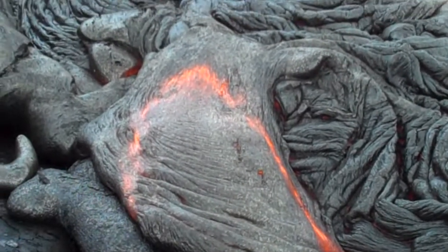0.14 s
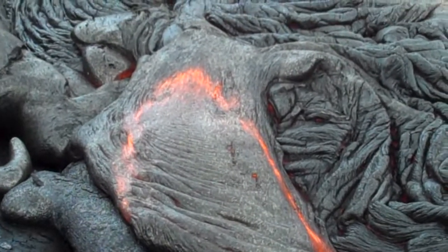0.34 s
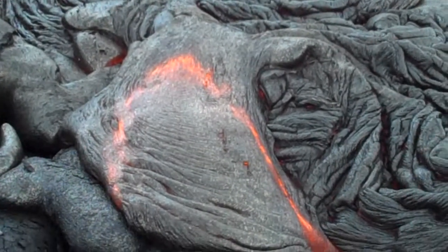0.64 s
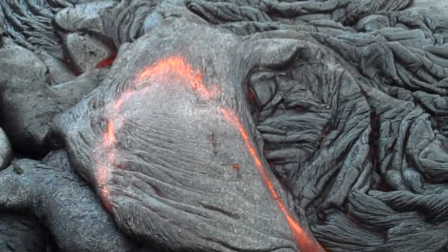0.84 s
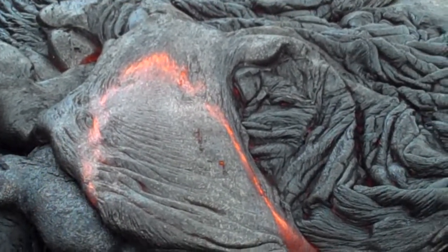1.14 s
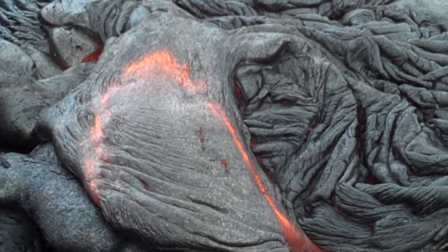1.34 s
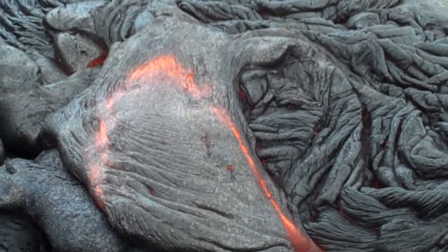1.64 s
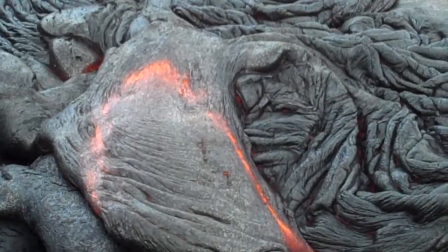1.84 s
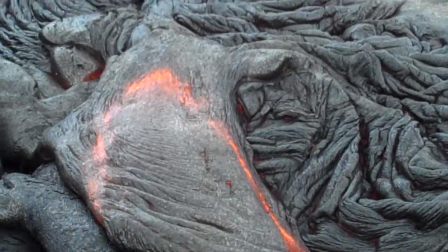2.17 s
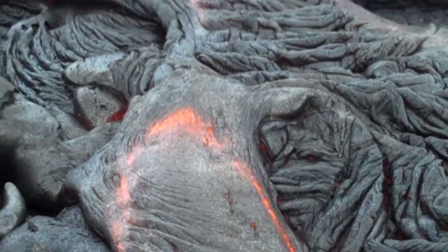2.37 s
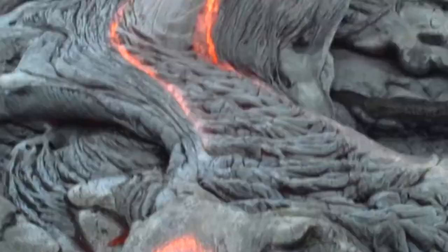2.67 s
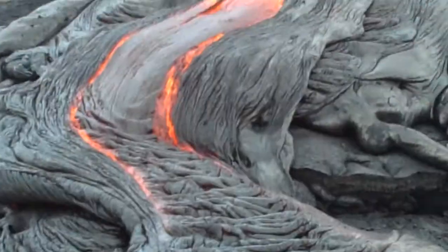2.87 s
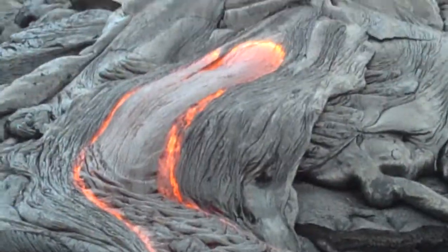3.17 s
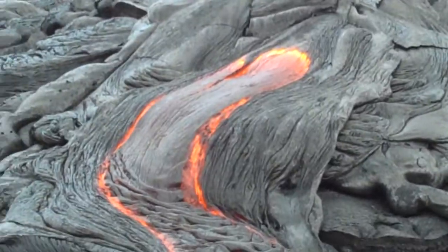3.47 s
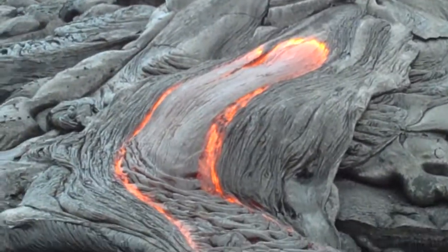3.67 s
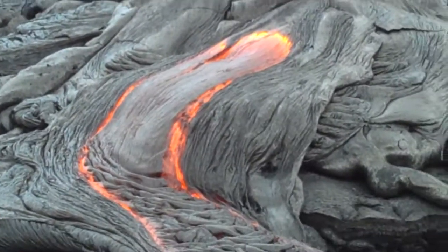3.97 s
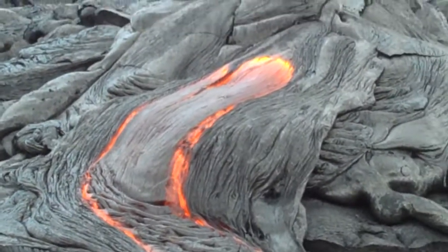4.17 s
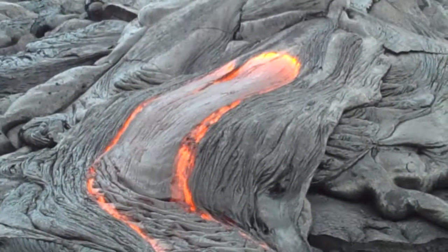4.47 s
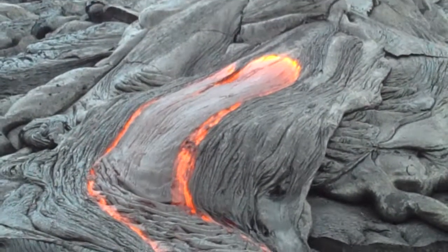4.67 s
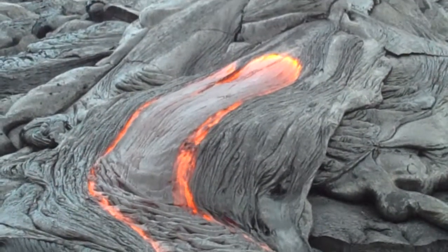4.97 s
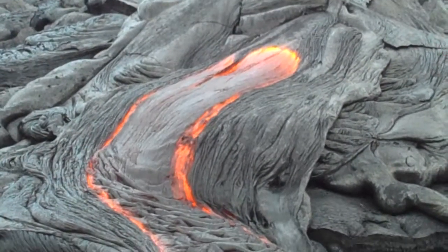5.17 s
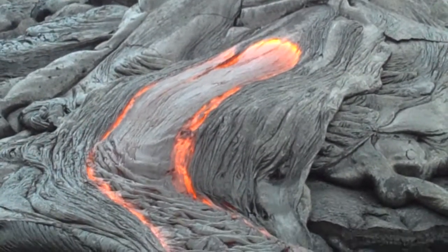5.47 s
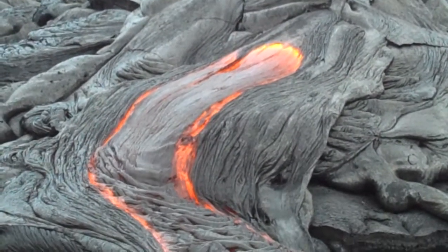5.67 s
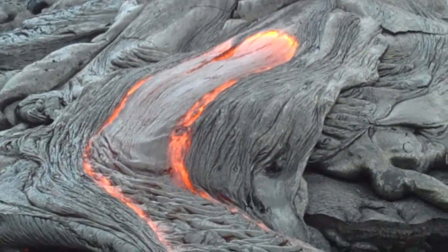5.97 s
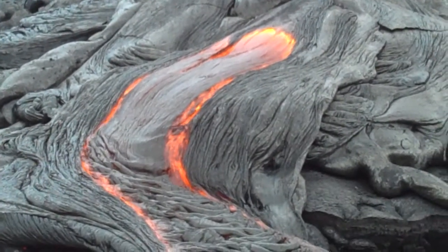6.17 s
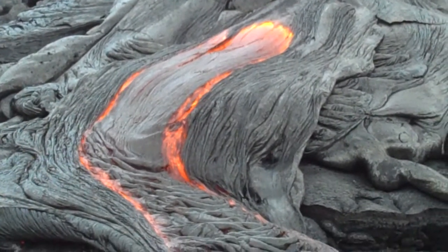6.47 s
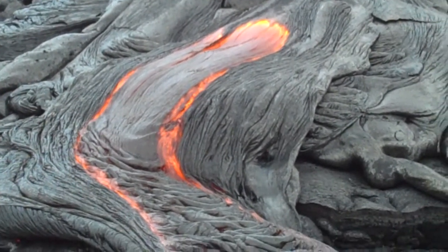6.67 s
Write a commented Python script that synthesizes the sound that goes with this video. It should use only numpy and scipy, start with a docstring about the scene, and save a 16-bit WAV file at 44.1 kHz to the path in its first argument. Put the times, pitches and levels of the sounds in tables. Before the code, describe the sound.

Outdoors and very close, cooling lava crust gives a continuous soft hiss filled with tiny irregular glassy ticks, over a barely audible low rumble. Faint muffled thuds, like wind or handling, bump in the first second. Small crumbling swells gather at about 0.9, 1.3 and 1.6 s, with dry cracks near 0.9 and 1.2 s and a chip at 1.3 s. A tight cluster of stronger cracks comes at 2.5 to 2.75 s, followed by low thuds. A gritty, rising rasp and crumble passes around 3.1 s, then one plate gives a hard, sharp snap at 3.4 s, the loudest moment. A chip taps at 3.55 s. Bright crackling bursts at 4.3 to 4.6 s, thins around 5 s, then returns glassier at 5.7 and 6.25 s. A short stout crack lands at 6.4 s; fine ticking and slightly fuller hiss continue to the end.

```python
"""Tiny glassy flakes tick without pause over a soft hiss: lava crust cooling outdoors, close to the microphone.
Hiss and faint rumble are coloured noise; ticks are random impulses and short clinks. Crumbling swells mix
coarse and fine grains, the skin rasps in gliding rings. Soft low thuds, as of handling or wind on the
microphone, are muffled noise. Single cracks ring, splinters tick, chips strike the microphone, and one plate
gives way with a sharp snap."""
import sys
import numpy as np
from scipy import signal
from scipy.fft import rfft, irfft, next_fast_len
from scipy.io import wavfile
from scipy.ndimage import map_coordinates

SR = 44100
rng = np.random.default_rng(int(sys.argv[2]) if len(sys.argv) > 2 else 0)


def persist_wave(psi):
    """Save psi, clipped to +-1, as 16-bit WAV."""
    counts = np.round(np.clip(psi, -1, 1) * 32767).astype(np.int16)
    wavfile.write(sys.argv[1], SR, np.atleast_2d(counts).T)


N = 300762

# swells of crumbling: peak_s, rise_s, fall_s (both to 1/e), coarse_gain_db, fine_gain_db
SWELL_ROWS = [(.24, .08, 0.075, -59, -59), (.875, 0.034, 0.057, -53, -52), (.93, .03, 0.045, -51.5, -61),
              (1.25, 0.057, .04, -56, -64), (1.335, .03, 0.035, -50.5, -53.5),
              (1.565, 0.023, .04, -46.5, -47.5), (1.685, 0.012, 0.011, -59, -54),
              (2.0, 0.023, 0.03, -58, -54), (2.135, 0.019, 0.02, -51, -53),
              (2.715, 0.048, 0.052, -53, -57.5), (2.835, 0.012, 0.017, -51.5, -70),
              (3.16, 0.099, 0.053, -54, -60), (3.225, 0.035, 0.041, -47, -49),
              (3.615, .015, 0.028, -62, -55.5), (3.77, 0.016, 0.022, -46.5, -59),
              (3.86, .03, 0.042, -53, -50.5), (4.21, 0.018, 0.014, -55.5, -58),
              (4.37, 0.043, 0.036, -60, -58.5), (4.45, 0.021, 0.09, -46.5, -44),
              (5.04, 0.22, 0.3, -62, -60.5), (5.671, .018, 0.056, -52.5, -43),
              (5.755, .035, 0.058, -55.5, -46.5), (5.97, 0.043, 0.044, -64, -50.5),
              (6.13, 0.068, .09, -63, -55), (6.262, 0.046, .04, -48.5, -44), (6.35, .04, 0.059, -62, -59.5)]


def amp(db):
    """Decibels to gain."""
    return 10 ** (np.asarray(db) / 20)


def unit(x):
    """x at rms 1."""
    return x / np.sqrt(np.mean(x ** 2) + 1e-20)


def wobble(rate_hz):
    """Smooth random curve with rate_hz knots a second."""
    knots = rng.standard_normal(int(N * rate_hz / SR) + 4)
    return map_coordinates(knots, [np.arange(N) * rate_hz / SR])


def filtered(x, response):
    """x times a complex response of frequency, zero-padded."""
    m = next_fast_len(len(x) + min(len(x), SR // 5))
    spectrum = rfft(x, m) * response(np.fft.rfftfreq(m, 1 / SR))
    return irfft(spectrum, m)[:len(x)]


def coloured(x, points):
    """x shaped by (hz, relative dB) points, linear over log frequency, at rms 1."""
    hz, db = np.transpose(points)
    return unit(filtered(x, lambda f: amp(np.interp(np.log(f + 1), np.log(hz), db))))


def resonance(f, hz, q):
    """Causal resonance: two equal band-passes in series, gain 1 at the centre."""
    damping = 1j * f * hz / q
    return (damping / (hz ** 2 - f ** 2 + damping)) ** 2


def add(track, start_s, sound):
    """Mix a sound into the track from start_s on."""
    part = track[max(round(start_s * SR), 0):][:len(sound)]
    part += sound[:len(part)]


def burst(t, decay_s):
    """Noise puff of energy 1, decaying to 1/e in decay_s."""
    puff = rng.standard_normal(len(t)) * np.exp(-t / decay_s)
    return puff / np.linalg.norm(puff)


def grains(rate_hz, spread_db):
    """Tiny fractures: impulses of random time, sign and size, rms 1."""
    fires = rng.random(N) < rate_hz / SR
    size = amp(spread_db * np.clip(rng.standard_normal(N), -2, 2))
    return unit(fires * size * rng.choice([-1, 1], N))


def flakes(rate_hz, pitch_hz, scatter, cycles, spread_db):
    """Loose flakes, each a brief decaying clink at its own pitch, rms 1; scatter is in log pitch."""
    draws = rng.standard_normal((int(rate_hz * N / SR), 2))
    start = rng.integers(0, N, (len(draws), 1))
    pitch = pitch_hz * np.exp(scatter * draws[:, :1])
    size = amp(spread_db * np.clip(draws[:, 1:], -2, 2))
    age = np.arange(SR // 200)
    turns = pitch * age / SR
    clinks = size * turns * np.exp(-turns / cycles) * np.sin(2 * np.pi * turns)
    return unit(np.bincount((start + age).ravel(), clinks.ravel(), N)[:N])


def hiss():
    """Far fractures merge into noise, with grains in flurries; nearer ones tick and clink singly."""
    # hiss level: time_s, gain_db
    gain_rows = [(0.0, -62.5), (2.14, -59.5), (2.68, -60.5), (3.78, -57), (4.16, -59), (6.29, -56.5),
                 (6.82, -59)]
    # hiss spectrum: hz, relative_db
    fizz_colour = [(200, -26), (700, -7.5), (1200, -6), (1700, -5.5), (2900, 2), (6000, -2.5), (9000, -1.5),
                   (13800, -0.5)]
    # near tick spectrum: hz, relative_db
    tick_colour = [(300, -31), (1000, -13), (2500, 3.5), (5000, -3.5), (9000, 3), (13800, -1)]
    gain_db = np.interp(np.arange(N) / SR, *np.transpose(gain_rows))
    flurry = np.clip(wobble(55), -1.6, 1.6)
    far = coloured(rng.standard_normal(N), fizz_colour) * amp(1.5 + 1.1 * flurry)
    middle = coloured(grains(rate_hz=1600, spread_db=6.0), fizz_colour) * amp(1.5 + 3.25 * flurry)
    near = coloured(grains(rate_hz=55, spread_db=5.5), tick_colour) * amp(-2.5)
    clinks = flakes(rate_hz=50, pitch_hz=3320, scatter=.37, cycles=1.0, spread_db=5.0) * amp(-8.0)
    return amp(gain_db) * (far + middle + near + clinks)


def air():
    """Faint, uneven outdoor rumble: low coloured noise."""
    # rumble spectrum: hz, relative_db
    air_colour = [(20, 4), (50, -13), (110, -10.5), (200, -15), (560, -18), (1200, -21), (3000, -45)]
    return coloured(rng.standard_normal(N), air_colour) * amp(-67.3 + 1.1 * wobble(9))


def swelling(peaks_db, creep_db):
    """Crumbling gain in dB: the power of every swell adds to a steady creep."""
    shape = 1.57  # 1 is a pointed swell, 2 a rounded one
    t = np.arange(N) / SR
    power = np.full(N, amp(creep_db) ** 2)
    for (peak_s, rise_s, fall_s, *_), db in zip(SWELL_ROWS, peaks_db):
        away = np.maximum((peak_s - t) / rise_s, (t - peak_s) / fall_s)
        envelope = np.exp(-np.minimum(abs(away), 10) ** shape)
        power += (amp(db) * envelope) ** 2
    return 10 * np.log10(power)


def crumbling():
    """Coarse flakes and fine splinters break in swarms; strong fine swells add more ringing and lumps."""
    # coarse grain spectrum: hz, relative_db
    coarse_colour = [(150, -34), (400, -17.5), (800, -5.5), (1200, -4), (1600, -6), (2000, -0.5),
                     (2500, -16), (5000, -19), (13800, -35)]
    # fine grain spectrum: hz, relative_db
    fine_colour = [(300, -20), (1500, -12.5), (2700, -4.5), (3600, -3), (4700, -2.5), (6200, -1),
                   (8500, -7.5), (13800, -17.5)]
    *_, coarse_peaks, fine_peaks = np.transpose(SWELL_ROWS)
    coarse_db = swelling(coarse_peaks, creep_db=-68)
    fine_db = swelling(fine_peaks, creep_db=-64)
    force_db = fine_db + 44  # relative to a strong swell

    clink = amp(-3.5) * flakes(rate_hz=1100, pitch_hz=1650, scatter=0.12, cycles=.9, spread_db=6)
    grind = amp(-4) * coloured(grains(rate_hz=2500, spread_db=6.5), coarse_colour)
    coarse = (clink + grind) * amp(coarse_db + 2.6 * wobble(170))

    ring = flakes(rate_hz=900, pitch_hz=4720, scatter=.13, cycles=1.54, spread_db=5.0)
    ring *= amp(-3.5 + 0.34 * force_db)
    dry_ticks = amp(-1.5) * coloured(grains(rate_hz=5000, spread_db=4), fine_colour)
    fine = (ring + dry_ticks) * amp(fine_db + 3.04 * wobble(380))

    lumps = flakes(rate_hz=660, pitch_hz=777, scatter=.29, cycles=.48, spread_db=8.0)
    lumps *= amp(fine_db - 15.5 + .3 * force_db)
    return coarse + fine + lumps


def cracks():
    """Each crack kicks a resonant flake; the ground adds an echo and scatter, a noise burst the tick."""
    # loudest cracks: start_s, size_db, pitch_hz, resonance_q, tick_db
    crack_rows = [(.14, -10.5, 2680, 2.4, -28), (.938, -8, 3200, 1.2, -20.5),
                  (1.2013, -6.5, 1460, 1.5, -27), (1.2026, -8, 3500, 1.1, -45),
                  (1.268, -14, 1510, 1.2, -30), (1.47, -13, 2730, 2.5, -30), (1.773, -14.5, 1570, 4.3, -25),
                  (2.0019, -11, 1160, 0.86, -27), (2.371, -10.5, 2350, 3, -24.5),
                  (2.4602, -18, 950, 0.32, -40), (2.5345, -12.5, 825, 0.34, -49),
                  (2.57, -11.5, 2600, 1.24, -45), (2.6747, -5, 2700, 0.71, -32), (2.712, 2, 1300, 2.5, -23),
                  (2.739, -7, 1440, 2, -25), (3.0567, -3.5, 2900, 0.91, -40),
                  (3.8296, -16.5, 3880, 0.63, -31), (3.8504, -8, 1650, 1.9, -28),
                  (4.0866, -15.5, 2480, 0.55, -44), (4.215, -15.5, 3000, 0.37, -35),
                  (4.2785, -3.5, 1750, 5.2, -23), (4.439, 0, 4340, 2.7, -25), (4.456, -3.5, 1650, 1.3, -20),
                  (4.6006, -5.5, 1230, 1.7, -29), (4.613, -12, 1230, 2.2, -29),
                  (5.656, -9.5, 1280, 0.68, -37), (5.68, -6, 4900, 2.1, -37),
                  (5.6959, -9.5, 1660, 0.3, -45), (5.7673, -8.5, 5110, 1.6, -36),
                  (5.8045, -12, 4400, 2, -27), (6.0115, -4.5, 1010, 1.2, -21.5),
                  (6.1922, -12, 1630, 1.9, -27), (6.4274, 4, 1360, 0.69, -50)]
    ground_delay_s = .0011
    out, t = np.zeros(N), np.arange(SR // 25) / SR
    for start_s, size_db, pitch_hz, q, tick_db in crack_rows:
        echo = amp(-13.5) * (t == t[round(ground_delay_s * SR)])
        ground = echo + amp(-12) * burst(t, decay_s=0.004)
        kick = (t == 0) + amp(-8.5) * burst(t, decay_s=0.0013) + ground
        ring = filtered(kick, lambda f: resonance(f, pitch_hz, q))
        tick = burst(t, decay_s=0.00044)
        add(out, start_s, amp(size_db) * ring + amp(tick_db) * tick)
    return out


def thuds():
    """Soft low thuds, as of handling or wind on the microphone: muffled noise, pitched higher if louder."""
    # thuds: centre_s, size_db, decay_s (to 1/e on either side)
    thud_rows = [(.21, -57, .011), (0.535, -60, .01), (0.582, -58, 0.014), (0.743, -60, .01),
                 (0.793, -58.5, 0.01), (1.149, -52.5, 0.0022), (1.278, -63, 0.033), (2.815, -47, 0.0057),
                 (2.836, -49, 0.01), (2.875, -56, 0.0099), (2.902, -51.5, .022), (2.97, -56.5, 0.028),
                 (3.451, -53.5, 0.0093), (3.666, -53.5, 0.0062), (3.909, -61, 0.0068),
                 (3.948, -59.5, 0.015), (4.984, -62, 0.012), (5.122, -58.5, 0.029), (5.745, -57.5, .014),
                 (5.833, -57.5, .014), (6.477, -60, 0.025), (6.699, -58, 0.014)]
    base_hz, base_db, octaves_per_db = 182, -59, 0.1
    out, t = np.zeros(N), np.arange(-SR // 10, SR // 10) / SR
    for centre_s, size_db, decay_s in thud_rows:
        hz = base_hz * 2 ** (octaves_per_db * (size_db - base_db))
        puff = rng.standard_normal(len(t)) * np.exp(-abs(t) / decay_s)
        muffle = lambda f: f / (f + 60) / (1 + (f / (1.4 * hz)) ** 4)
        bump = unit(filtered(puff, muffle))
        add(out, centre_s + t[0], amp(size_db - 9) * bump)
    return out


def splinters():
    """Glassy splinters flick off: impulses through a broad resonance, too damped to ring."""
    # splinters: start_s, size_db
    splinter_rows = [(.2886, -19), (.326, -22.5), (.4167, -22), (.6008, -23), (.8064, -22), (1.379, -24),
                     (1.632, -18.5), (3.0188, -21), (4.0166, -19), (4.507, -19), (4.764, -20),
                     (5.5097, -17), (5.909, -22), (6.1104, -16), (6.3298, -23), (6.3392, -22),
                     (6.5708, -21), (6.692, -21.5)]
    kicks = np.zeros(N)
    for start_s, size_db in splinter_rows:
        add(kicks, start_s, amp([size_db]))
    return filtered(kicks, lambda f: resonance(f, hz=6500, q=0.32))


def rasps():
    """Wrinkled skin drags in tiny random slips, each ringing a fold whose pitch glides as it bends."""
    # rasps: start_s, length_s, level_db (before the fade), start_hz, end_hz
    rasp_rows = [(.66, 0.4, -60.5, 1480, 1540), (1.19, 0.38, -62.5, 1595, 1380),
                 (2.662, .38, -60, 1487, 1400), (2.858, 0.37, -61.5, 960, 1050),
                 (3.02, .25, -53.5, 1398, 1774), (3.73, 0.084, -55, 1600, 1650),
                 (4.16, 0.384, -63, 1840, 1780), (4.45, 0.155, -59.5, 1050, 1130),
                 (4.88, .28, -61, 1620, 1350), (5.72, 0.69, -64, 1503, 1520)]
    ring_s = 0.00089
    out = np.zeros(N)
    slips = grains(rate_hz=450, spread_db=5.0) * np.exp(2j * np.pi * rng.random(N))
    age = np.arange(SR // 50) / SR
    ringing = signal.fftconvolve(slips, age * np.exp(-age / ring_s))
    for start_s, length_s, level_db, start_hz, end_hz in rasp_rows:
        u = np.linspace(0, 1, round(length_s * SR))
        phase = 2 * np.pi * np.cumsum(start_hz + (end_hz - start_hz) * u) / SR
        fold = np.real(ringing[round(start_s * SR):][:len(u)] * np.exp(1j * phase))
        fade = np.sin(np.pi * u)
        add(out, start_s, amp(level_db) * unit(fold) * fade)
    return out


def taps():
    """A chip striking the microphone gives one low-passed push without a ring, and a glassy noise tick."""
    # chips hitting the microphone: start_s, size_db, corner_hz, tick_db
    tap_rows = [(1.3414, -6, 1060, -22), (1.7365, -12.5, 4060, -29), (1.8625, -13, 935, -30),
                (1.9843, -23, 4690, -24), (2.7088, -7.5, 1610, -17), (2.7784, -14.5, 1380, -29),
                (3.547, -2, 1460, -23.5), (3.8745, -11, 1200, -21.5), (4.279, -9, 1950, -31),
                (4.8478, -21, 1200, -35), (5.2586, -22, 1200, -28), (6.3718, -17, 2790, -39)]
    out, t = np.zeros(N), np.arange(SR // 50) / SR
    for start_s, size_db, corner_hz, tick_db in tap_rows:
        push = t * np.exp(-2 * np.pi * corner_hz * t)
        tick = burst(t, decay_s=0.00009)
        add(out, start_s, amp(size_db) * push / push.sum() + amp(tick_db) * tick)
    return out


def snap():
    """A plate clicks, buckles inward, then springs out: pressure lobes plus a tearing noise burst."""
    out, t = np.zeros(N), np.arange(SR // 20) / SR
    lobe = lambda at_s, width_s: np.exp(-.5 * ((t - at_s) / width_s) ** 2)
    click = 0.41 * lobe(at_s=.0001, width_s=.00006)
    buckle = 0.35 * lobe(at_s=0.00025, width_s=0.00024)
    spring = 0.16 * lobe(at_s=0.00085, width_s=.0002) + 0.21 * lobe(at_s=0.001, width_s=0.00043)
    leak = lambda f: 1j * f / (1j * f + 55)  # the pressure leaks away: 55 Hz high-pass
    swing = filtered(click - buckle + spring, leak)
    tear = amp(-4.5) * burst(t, decay_s=0.0016)
    add(out, 3.3713, swing + tear)
    return out


def scene():
    """Sum of all sources at one microphone."""
    background = hiss() + air() + crumbling()
    events = cracks() + thuds() + splinters() + rasps() + taps() + snap()
    return (background + events)[None]


def record(dry):
    """Very steep zero-phase low-pass at the top of the band."""
    top_hz = 14050
    return filtered(dry[0], lambda f: 1 / np.sqrt(1 + (f / top_hz) ** 160))[None]


dry = scene()
out = record(dry)
persist_wave(out)
```